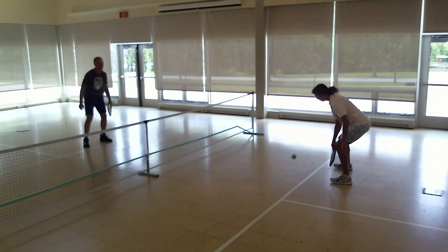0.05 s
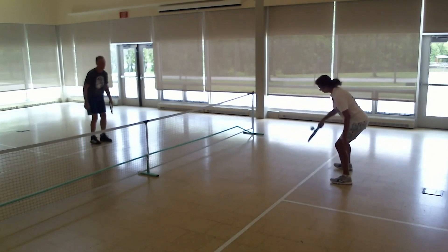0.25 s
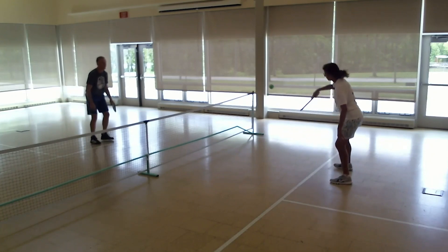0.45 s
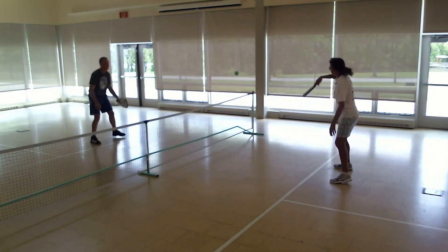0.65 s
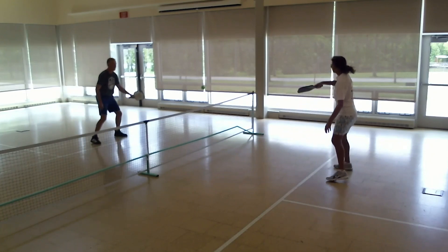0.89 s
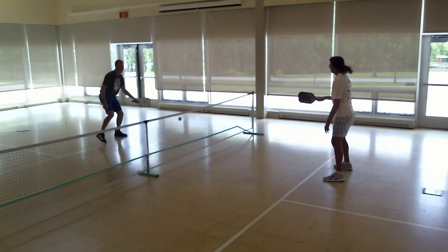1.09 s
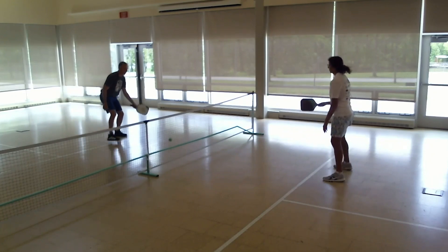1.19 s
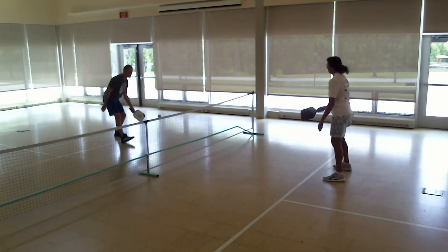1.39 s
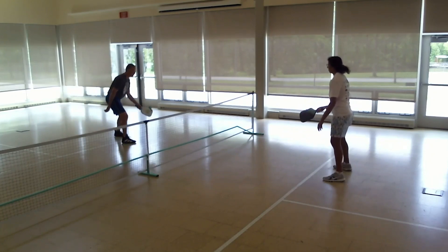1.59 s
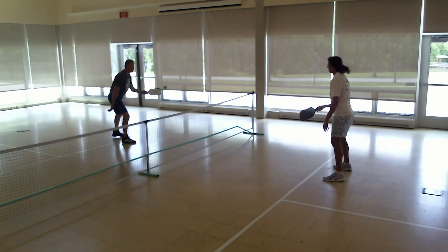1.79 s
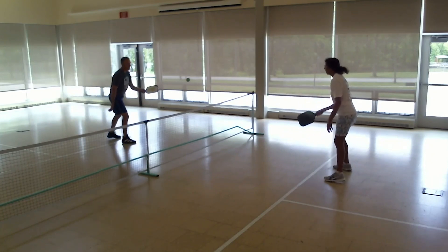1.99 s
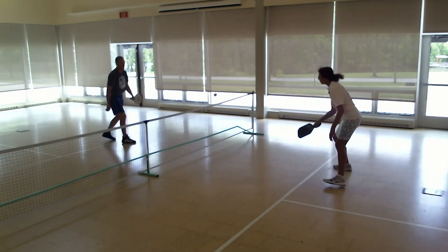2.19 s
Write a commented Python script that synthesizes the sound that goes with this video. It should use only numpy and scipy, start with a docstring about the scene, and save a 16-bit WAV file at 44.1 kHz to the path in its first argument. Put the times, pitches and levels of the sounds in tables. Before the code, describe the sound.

Pickleball paddles pop in an echoing gym. The ball bounces, a nearby paddle hits it sharply, it bounces again, and a farther paddle returns it with a rounder pop. Shoes shuffle softly over a faint ventilation rumble.

```python
"""A gym during a soft pickleball rally. The ball bounces, the near player pops it back, it bounces
again and the far player returns it. Each impact is a brief crack of the plastic shell plus a few
fast-dying modes, followed by discrete echoes and the hall's diffuse tail. Shoes thud and shuffle on
the floor over a ventilation rumble and a faint hiss."""
import sys
import numpy as np
from scipy import signal
from scipy.fft import rfft, irfft
from scipy.io import wavfile

SR = 44100
rng = np.random.default_rng(int(sys.argv[2]) if len(sys.argv) > 2 else 0)


def pcm_store(signal):
    """Save signal as 16-bit PCM."""
    levels = np.round(np.clip(np.atleast_2d(signal), -1, 1) * 32767)
    wavfile.write(sys.argv[1], SR, levels.astype(np.int16).T)


N = 99225
TIME = np.arange(N) / SR
FREQS = np.maximum(np.arange(N // 2 + 1) * SR / N, 1)


def from_db(db):
    """Amplitude ratio of a level: a factor of ten per 20 dB."""
    return 10 ** (np.asarray(db) / 20)


def at_hz(points, hz):
    """Interpolation on a logarithmic frequency axis."""
    points = np.array(points)
    return np.interp(np.log(hz), np.log(points[:, 0]), points[:, 1])


def noise(spectrum):
    """Spectral shaping: white noise weighted by a table of levels."""
    return irfft(rfft(rng.standard_normal(N)) * from_db(at_hz(spectrum, FREQS)), N)


def delayed(x, s):
    """Pure delay of s seconds, to the nearest sample."""
    return np.interp(np.arange(N) - np.round(s * SR), np.arange(N), x, left=0, right=0)


def filtered(x, kind, hz):
    """Second-order low-pass or high-pass: 12 dB per octave beyond the corner."""
    return signal.sosfilt(signal.butter(2, hz, kind, fs=SR, output="sos"), x + 1e-18)


def decay(t60):
    """Exponential damping: 60 dB in t60 seconds."""
    return from_db(np.maximum(-60 * TIME / t60, -300))


def mode(hz, t60, rise_cycles=.45):
    """Damped oscillator: it swells during contact, then decays freely."""
    swell = 1 - np.exp(-TIME * hz / rise_cycles)
    return np.sin(2 * np.pi * hz * TIME) * swell * decay(t60)


def click(spectrum):
    """Minimum-phase impulse of the given spectrum: nothing sounds before its onset."""
    cepstrum = irfft(np.log(from_db(at_hz(spectrum, FREQS))), N)
    causal = 1 + np.sign(np.fft.fftfreq(N))
    return irfft(np.exp(rfft(cepstrum * causal)), N)


def shell_crack(spectrum, t60):
    """Broadband transient: damped noise with the energy of a click of the same spectrum."""
    envelope = decay(t60)
    return noise(spectrum) * envelope / np.sqrt(np.sum(envelope ** 2))


def wall_echo(x, delay_s, db, cutoff_hz):
    """Reflection with treble absorption; scattering from blinds and frames draws it out."""
    scatter = rng.standard_normal(N) * decay(t60=.034)
    smeared = signal.fftconvolve(x, scatter / np.sqrt(np.sum(scatter ** 2)))[:N]
    reflected = filtered(x + from_db(-3) * smeared, "low", cutoff_hz)
    return from_db(db) * delayed(reflected, delay_s)


def reverberation(x, onset_s, build_s, db=0):
    """Diffuse field: half-octave bands of noise build up, then decay, the treble first."""
    # reverberation time of the hall: f/Hz, t60/s
    hall_t60 = [(100, 2.45), (400, 1.29), (1000, 1.21), (2000, 1.036), (3800, 0.75), (5500, 0.53),
                (7500, 0.52), (10000, 0.36), (16000, .35)]
    clumps_per_s, clump_db = 140, 2  # reflections arrive in clumps
    early_scatter = from_db(-12.5)  # from net and players, before the walls answer
    white = rfft(rng.standard_normal(N))
    build = np.maximum(1 - np.exp(-np.maximum(TIME - onset_s, 0) / build_s), early_scatter)
    build *= from_db(clump_db * np.interp(TIME * clumps_per_s, np.arange(N), rng.standard_normal(N)))
    edges_hz = 30 * 2 ** np.arange(0, 9.6, .5)
    response = 0
    for low, high in zip(edges_hz, edges_hz[1:]):
        band = irfft(white * (FREQS >= low) * (FREQS < high), N)
        band *= build * decay(at_hz(hall_t60, np.sqrt(low * high)))
        response += band * np.sqrt(2 * (high - low) / SR / np.sum(band ** 2))
    return from_db(db) * signal.fftconvolve(x, response)[:N]


def impact(modes, crack, echoes, crack_t60, **tail):
    """Directivity: each part has a direct and a hall level. Returns the direct and the hall sound."""
    contact_s = .00067  # the modes follow the crack by this much
    bass_limit_hz = 182  # ball and paddle are too small to radiate well below this
    direct = shell_crack([(hz, db) for hz, db, _ in crack], crack_t60)
    hall_spectrum = [(hz, db) for hz, _, db in crack]
    hall_modes = 0
    for hz, direct_db, hall_db, t60 in modes:
        tone = delayed(mode(hz, t60), contact_s)
        direct += from_db(direct_db) * tone
        hall_modes += from_db(hall_db) * tone
    hall = sum(wall_echo(hall_modes + shell_crack(hall_spectrum, crack_t60), *echo) for echo in echoes)
    hall += reverberation(hall_modes + click(hall_spectrum), **tail)
    return filtered(direct, "high", bass_limit_hz), filtered(hall, "high", bass_limit_hz)


def ball_bounces():
    """Impact excitation of a hollow shell; the first bounce falls just before t = 0 and echoes on."""
    # bounces: t/s, direct level/dB, hall level/dB, side of the net
    bounces = [(-.008, 5, 0.5, "near"), (1.2138, -0.5, -2, "far")]
    # modes of the ball: f/Hz, direct level/dB, hall level/dB, t60/s
    modes = [(380, -31, -24.5, 0.014), (685, -12.5, -10, 0.0049), (1000, -19, -24.5, 0.0075),
             (1920, -28, -26, 0.01), (2413, -26, -32.5, 0.0059)]
    # crack of the shell: f/Hz, direct level/dB, hall level/dB
    crack = [(1500, -12, -13.5), (3400, -13.5, -15.5), (6900, -17.5, -14), (10300, -10, -25.5),
             (11700, -36, -63), (16000, -31, -39)]
    # echoes for each side of the net: delay t/s, level/dB, cutoff f/Hz
    echoes = {"near": [(.032, -13, 6100), (.043, -8.5, 12100), (.079, -10.5, 3000)],
              "far": [(.0157, -19, 10100), (.0287, -10, 9000)]}
    sound = 0
    for s, direct_db, hall_db, side in bounces:
        direct, hall = impact(modes, crack, echoes[side], crack_t60=.0063, onset_s=.024, build_s=.0083)
        sound += delayed(from_db(direct_db) * direct + from_db(hall_db) * hall, s)
    return sound


def ventilation():
    """Stationary noise: a rumble with its energy mostly in the bass."""
    # rumble spectrum: f/Hz, level/dB
    spectrum = [(20, -47), (45, -50), (100, -42.5), (200, -42.5), (330, -39), (500, -45.5), (700, -72),
                (950, -48.5), (1400, -57.5), (3000, -64), (8000, -67.5), (16000, -70)]
    return noise(spectrum)


def shuffling_feet():
    """Amplitude-modulated noise: a soft rumble as the players shift their feet."""
    # shuffle spectrum: f/Hz, level/dB
    spectrum = [(20, -48), (50, -35.5), (120, -27), (300, -31.5), (500, -44), (1000, -49), (4000, -89)]
    # its envelope: t/s, level/dB
    envelope = [(0, -9), (.25, -19), (.55, -2), (.72, -1), (.86, 7), (1.0, -9), (1.2, -9), (1.42, -26),
                (1.58, -10), (1.8, -3), (2.25, -8.5)]
    return from_db(np.interp(TIME, *np.transpose(envelope))) * noise(spectrum)


def hiss():
    """Partly coherent noise: a common part swells and sinks over a steady part in antiphase."""
    # hiss spectrum: f/Hz, level/dB
    spectrum = [(500, -47), (2000, -62), (5000, -70.5), (9000, -65), (14000, -63.5), (16000, -65)]
    # envelope of the part common to both ears: t/s, level/dB
    envelope = [(0, 2.5), (.55, 1.5), (.72, 0.5), (.82, 6.5), (.91, 2.5), (.945, 10.5), (1.02, -1),
                (1.2, 1.5), (1.4, -1), (1.6, -9), (1.75, 3.5), (1.95, 2), (2.25, -1)]
    common = from_db(np.interp(TIME, *np.transpose(envelope))) * noise(spectrum)
    return common + from_db(-14) * noise(spectrum) * np.array([[1], [-1]])


def footfalls():
    """Heavily damped floor vibration: thuds of a few cycles, prolonged by reverberation."""
    # steps: t/s, relative level/dB, f/Hz
    steps = [(0.221, -33.5, 61), (.255, -28, 50), (0.329, -26.5, 70), (0.35, -16, 148), (.412, -17.5, 110),
             (0.444, -35, 60), (.575, -30, 83), (0.682, -44, 185), (0.768, -35, 165), (.82, -35.5, 130),
             (0.934, -25, 67), (1.128, -37, 50), (1.633, -35.5, 55), (1.83, -39, 65), (2.125, -33, 240),
             (2.202, -41, 69)]
    decay_cycles = 2.68
    thuds = 2 * sum(from_db(db) * delayed(mode(hz, decay_cycles / hz), s) for s, db, hz in steps)
    return thuds + reverberation(thuds, onset_s=.0201, build_s=.0067, db=-6.5)


def near_paddle(hit_s=.246):
    """Impact excitation close by: a sharp pop. The paddle faces up, so its back cracks off the floor."""
    # modes of paddle and ball: f/Hz, direct level/dB, hall level/dB, t60/s
    modes = [(328, -10.5, -10, 0.017), (444.5, -1.5, -7, .014), (879, -7, -15, 0.019),
             (983, -12.5, -12.5, .018), (1517, -15.5, -14, 0.018), (1590, -19, -54, 0.013),
             (2038, -9, -20, 0.016), (2450, -14, -26.5, 0.01), (2950, -28, -28, 0.017),
             (4180, -11.5, -26, 0.0059), (4650, -11.5, -37, 0.0037), (6550, -18.5, -38, 0.0094)]
    # crack of the shell: f/Hz, direct level/dB, hall level/dB
    crack = [(700, -27, -6), (1510, -14, -27), (2800, -5, -9), (3740, -3, 4), (5160, 10, -5.5),
             (7600, -1.5, -0.5), (10800, 11.5, -8.5), (11030, -21, -17), (16200, -19, -31)]
    # wall and ceiling echoes: delay t/s, level/dB, cutoff f/Hz
    echoes = [(0.0136, -38, 12000), (0.0272, -19.5, 5000), (0.0361, -4.5, 980), (0.051, -11, 10000),
              (.081, -9, 9100), (.088, -10.5, 7000), (0.1151, -9.5, 2500), (.124, -13.5, 8140),
              (.166, -12, 1710)]
    # extra crack off the floor: f/Hz, level/dB
    floor_crack = [(700, -31), (2200, -18), (3300, -7), (4500, 17), (6800, 3), (8000, -24), (10000, -10),
                   (12000, -28), (16000, -20)]
    floor_s = .00385
    direct, hall = impact(modes, crack, echoes, crack_t60=.007, onset_s=.029, build_s=.04, db=-.38)
    pop = delayed(direct + floor_image(direct, floor_s, db=.33) + hall, hit_s)
    return pop + delayed(shell_crack(floor_crack, t60=.0058), hit_s + floor_s)


def floor_image(direct, delay_s, db):
    """Image source: the floor mirrors the back of the paddle, which radiates in opposite phase."""
    return -from_db(db) * delayed(direct, delay_s)


def far_paddle(hit_s=1.631):
    """Impact excitation across the net: weaker high modes give a rounder pop."""
    # modes of paddle and ball: f/Hz, direct level/dB, hall level/dB, t60/s
    modes = [(356.4, -16.5, -17, 0.024), (455.4, -16, -3, 0.019), (550, -7.5, -17, 0.023),
             (998, -11.5, -10, 0.036), (1448, -28, -21, 0.028), (1920, -34.5, -29.5, .024),
             (2930, -37, -29.5, 0.024)]
    # crack of the shell: f/Hz, direct level/dB, hall level/dB
    crack = [(750, -25, -20), (1540, -4, -4), (2550, -26, -23), (3400, -17, -5), (6960, -15.5, -8.5),
             (9600, -18, -14.5), (11800, -25, -26), (16000, -34, -23)]
    # wall and ceiling echoes: delay t/s, level/dB, cutoff f/Hz
    echoes = [(0.0134, -31.5, 12500), (.026, -14, 8500), (.033, -17, 10000), (0.038, -9.5, 8000),
              (0.057, -10, 1980)]
    direct, hall = impact(modes, crack, echoes, crack_t60=.011, onset_s=.041, build_s=.011)
    return delayed(direct + floor_image(direct, delay_s=.00139, db=-11.5) + hall, hit_s)


def scene():
    """Superposition, nearly in mono: small phase and level differences, louder on the right."""
    left_db, right_db = -.7, .7
    sound = ball_bounces() + ventilation() + shuffling_feet() + hiss()
    sound += footfalls() + near_paddle() + far_paddle()
    quadrature = from_db(-30) * signal.hilbert(sound.mean(axis=0)).imag
    return (sound + quadrature * np.array([[1], [-1]])) * from_db([[left_db], [right_db]])


def record(dry):
    """Band limiting: a steep elliptic low-pass removes the highest treble."""
    cutoff_hz = 16000
    return signal.sosfilt(signal.ellip(10, .1, 80, cutoff_hz, fs=SR, output="sos"), dry)


dry = scene()
out = record(dry)
pcm_store(out)
```